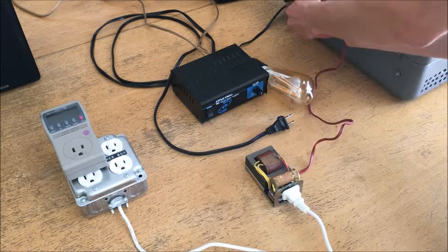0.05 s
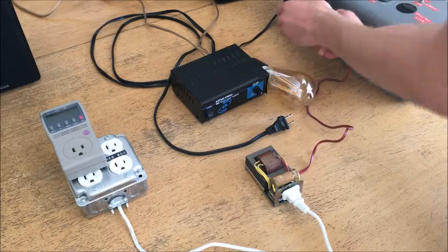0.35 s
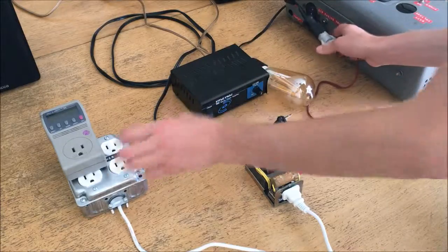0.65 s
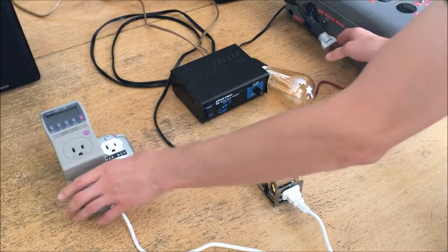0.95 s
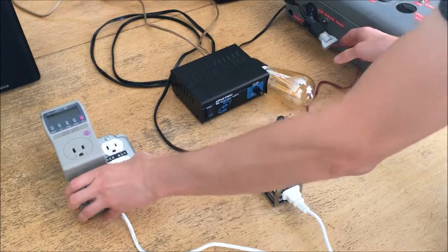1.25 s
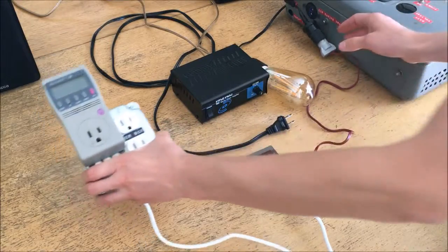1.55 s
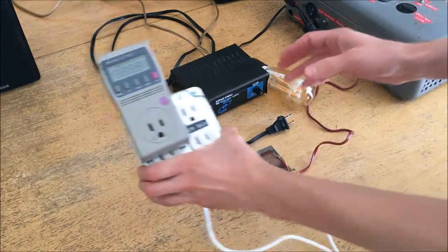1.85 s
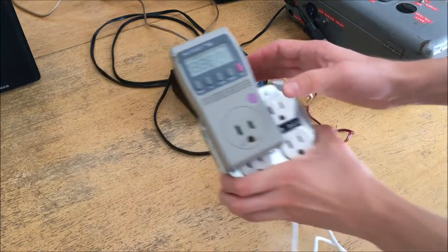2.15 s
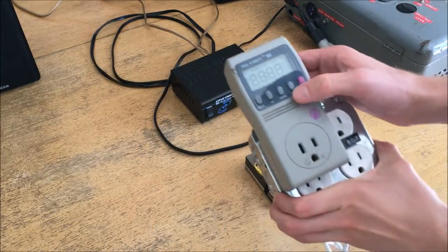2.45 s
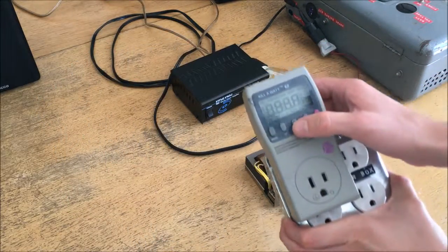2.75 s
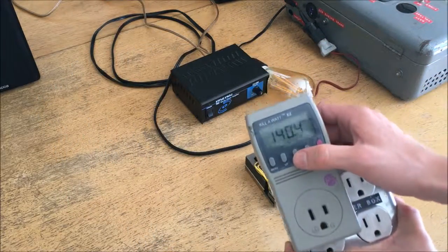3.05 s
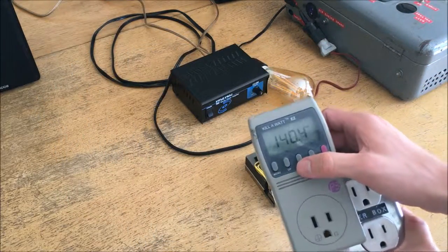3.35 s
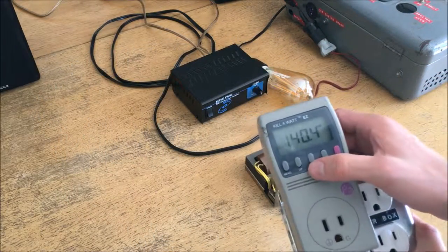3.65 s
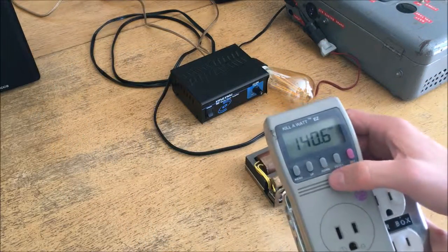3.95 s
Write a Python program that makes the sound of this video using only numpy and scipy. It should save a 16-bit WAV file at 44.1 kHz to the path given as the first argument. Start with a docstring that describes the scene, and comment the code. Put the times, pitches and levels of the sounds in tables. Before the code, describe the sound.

An old power inverter buzzes harshly and steadily, with a knock and a small click.

```python
"""Vibrator inverter on a wooden table

A small room, the microphone close to an old inverter. Its reed strikes the contacts 59 times a second
over the hum of the iron core; moving arms shade and scatter the bright clicks. A hand bumps the table,
an outlet box knocks as it is lifted, and a meter button clicks, over a low rumble."""
import sys
import numpy as np
from scipy import signal
from scipy.fft import rfft, irfft
from scipy.io import wavfile
from scipy.ndimage import uniform_filter1d

SR = 44100
rng = np.random.default_rng(int(sys.argv[2]) if len(sys.argv) > 2 else 0)


def transcribe(u):
    """Save the signal u as a 16-bit wav file named by the first command-line argument.

    u: samples, shape (n,) or (channels, n), limited to [-1, 1]; the rate is SR.
    q: integer samples, one column per channel.
    """
    v = np.clip(np.atleast_2d(u).T, -1, 1)
    q = np.round(v * 32767).astype(np.int16)
    wavfile.write(sys.argv[1], SR, q)


N = 176400
TIME_S = np.arange(N) / SR
CUTOFF_HZ = 15830


def amp(db):
    """Decibels to gain."""
    return 10 ** (np.asarray(db) / 20)


def unit(x):
    """Scales to rms 1."""
    return x / np.sqrt(np.mean(abs(x) ** 2) + 1e-20)


def curve(rows, column=1):
    """One column of a time table, at every sample."""
    rows = np.array(rows)
    return np.interp(TIME_S, rows[:, 0], rows[:, column])


def colour(x, points):
    """Minimum-phase filter through points of frequency_hz, gain_db."""
    point_hz, point_db = np.transpose(points)
    hz = abs(np.fft.fftfreq(8192, 1 / SR))
    log_gain = np.log(amp(np.interp(np.log(hz + 1), np.log(point_hz), point_db)))
    taps = np.fft.ifft(np.exp(np.conj(signal.hilbert(log_gain)))).real[:4096]
    return signal.oaconvolve(x, taps)[:N]


def drift(times, step_s, count):
    """Independent slow random curves, shape (times, count)."""
    weight = np.exp(-(times[:, None] / step_s - np.arange(-1, 40)) ** 2)
    weight /= np.linalg.norm(weight, axis=1, keepdims=True)
    return weight @ rng.standard_normal((41, count))


def add(mix, start, sound):
    """Mixes a sound in from a sample on."""
    part = mix[start:][:len(sound)]
    part += sound[:len(part)]


# Swells of the rumble: time_s, level_db
RUMBLE_LEVEL = [(0, -43), (.2, -46.5), (.3, -49), (.58, -58), (.75, -67), (1, -61.5), (1.42, -58),
                (1.62, -67), (1.8, -49.5), (2.4, -57), (2.8, -63), (3.35, -58.5), (4, -58)]
# Colours of the rumble and of the air: frequency_hz, relative_db
RUMBLE_COLOUR = [(20, -33), (36, -19), (46, -22), (56, -7), (65, -2), (74, -4), (85, -16), (105, -11),
                 (160, -36), (400, -73)]
AIR_COLOUR = [(20, -12), (100, -1), (170, -3), (300, -7), (550, -9), (800, -12), (2000, -13), (6000, -12),
              (16000, -14)]

def room_tone():
    """All around the microphone: a low swelling rumble and the still air of the room."""
    rumble = unit(colour(rng.standard_normal(N), RUMBLE_COLOUR))
    air = unit(colour(rng.standard_normal(N), AIR_COLOUR))
    return amp(curve(RUMBLE_LEVEL)) * rumble + amp(-52) * air


def reverb(x, t60_s=.45):
    """The small room's diffuse tail reaches the microphone just after the direct sound."""
    t = np.arange(SR // 2) / SR
    tail = rng.standard_normal(len(t)) * amp(-60 * t / t60_s) * (t > .004)
    return signal.oaconvolve(x, tail / np.linalg.norm(tail))[:N]


def struck(hits, modes, rise_s, scuff_db, scuff_s, wet_db):
    """Each hit rings the modes of an object, with a short scuff of noise in the same range."""
    t, out = np.arange(SR // 3) / SR, np.zeros(N)
    band = signal.butter(3, [modes[0][0], modes[-1][0]], "band", fs=SR, output="sos")
    for start_s, hit_db in hits:
        ring = sum(amp(db - 60 * t / t60) * np.sin(2 * np.pi * hz * t) for hz, db, t60 in modes)
        noise = unit(signal.sosfilt(band, rng.standard_normal(len(t))))
        scuff = amp(scuff_db) * np.exp(-t / scuff_s) * noise
        attack = 1 - np.exp(-t / rise_s)
        add(out, round(start_s * SR), amp(hit_db) * attack * (ring + scuff))
    return out + amp(wet_db) * reverb(out)


# Hits at the table: start_s, gain_db
BOX_KNOCKS = [(.775, -41), (1.5470, -33), (1.5512, -20.5)]
TABLE_BUMPS = [(.548, -39.5), (.572, -42.5), (.700, -46)]
BUTTON_CLICKS = [(3.9505, -23.5), (3.9526, -22.5), (3.9542, -27)]
# Modes of each object: pitch_hz, relative_db, t60_s
BOX_MODES = [(334, -30, 0.025), (389.6, -1, 0.08), (448, -11, 0.065), (719, -7.5, 0.058), (853, -1, 0.028),
             (1040, -14, .03), (1415, -10, 0.022), (1666, -17, 0.027), (2370, -19, .025), (3100, -17, .025)]
TABLE_MODES = [(105, -7, 0.09), (147, 7, 0.065), (210, 4.5, 0.081), (266, 5, 0.06)]
BUTTON_MODES = [(1540, -17, .012), (2300, -12, 0.011), (3730, -28, .01), (5440, -10, 0.012),
                (6035, -7, .01), (6040, 3, 0.0086), (6700, -7, .008)]

def handling():
    """Near the microphone the outlet box knocks, a hand bumps the wood and the meter button snaps."""
    box = struck(BOX_KNOCKS, BOX_MODES, rise_s=.003, scuff_db=-14, scuff_s=.011, wet_db=-7)
    table = struck(TABLE_BUMPS, TABLE_MODES, rise_s=.004, scuff_db=-8, scuff_s=.027, wet_db=-15)
    button = struck(BUTTON_CLICKS, BUTTON_MODES, rise_s=.00019, scuff_db=-11, scuff_s=.0018, wet_db=-7)
    return box + table + button


def lifted(from_s=1.35, to_s=2.5):
    """0 while the outlet box rests on the table, 1 once it is held above the inverter."""
    return np.clip((TIME_S - from_s) / (to_s - from_s), 0, 1)


# Core and frame partials, relative levels: reed_multiple (played rounded), box_resting_db, box_held_db
CORE_PARTIALS = [(2.01, -12.5, -12), (2.99, -9, -5.5), (4.023, -4, -2.5), (5.015, -11, -10.5),
                 (6, -14.5, -12), (7, -15, -12), (8, -26.5, -20.5), (9.023, 1, 2), (10.002, -2, -2.5),
                 (10.83, -27, -23.5), (11.97, -22, -17), (13, -23.5, -20), (14, -26.5, -22.5),
                 (15.014, -11, -12), (16.046, -17.5, -12), (17, -16.5, -21), (18, -35, -21.5),
                 (19, -11, -10.5), (20, -9.5, -8), (21.08, -21, -5), (22, -12, -13), (22.95, -10, -15),
                 (24, -22, -46), (25, -28.5, -20.5), (26, -25, -21), (27, -25, -24), (28, -31.5, -30),
                 (29, -51, -26), (30.12, -15.5, -17.5), (31.12, -18.5, -14)]
FRAME_PARTIALS = [(47, -27, -20), (50, -19, -14.5), (57, -19, -6.5), (59, -11, -14.5), (63.4, -12, -16),
                  (64, -18, -11.5), (66.8, -18, -25)]

def core_hum(swings, level_db=-44, waver_db=1.24):
    """The iron core hums and the metal frame rings; their harmonics shift in balance as the box lifts."""
    partials = CORE_PARTIALS + FRAME_PARTIALS
    coarse_s = np.linspace(0, N / SR, 100)
    wavers = amp(waver_db * drift(coarse_s, step_s=.308, count=len(partials)))
    phases = rng.random(len(partials))
    held, out = lifted(), np.zeros(N)
    for (multiple, rest_db, held_db), waver, phase in zip(partials, wavers.T, phases):
        level = amp(rest_db) * (1 - held) + amp(held_db) * held
        tone = np.sin(2 * np.pi * (round(multiple) * swings + phase))
        out += level * np.interp(TIME_S, coarse_s, waver) * tone
    return amp(level_db) * unit(out)


def reed_strikes(swings, first_s=.0103, rise_s=.00018, fall_s=.00091, drift_s=.7, jitter_db=.25):
    """The reed hits the contacts: one short metallic burst per swing, each much like the last."""
    strikes_s = np.interp(np.arange(int(swings[-1])), swings, TIME_S) + first_s
    t, hz = np.arange(512) / SR, np.fft.rfftfreq(1024, 1 / SR)
    envelope = (1 - np.exp(-t / rise_s)) * np.exp(-t / fall_s)
    # The burst changes slowly, and four drift steps further while the box moves.
    drift_clock = strikes_s + 4 * drift_s * np.interp(strikes_s, TIME_S, lifted())
    alike = unit(rfft(envelope * drift(drift_clock, drift_s, count=len(t)), 2 * len(t)))
    alike = unit(alike / (abs(alike) + .04) ** .72)  # evens out the spectrum
    alike /= np.sqrt(np.mean(abs(alike) ** 2, axis=1, keepdims=True))
    # A share is new at every strike, most of all in the top treble.
    fresh = unit(rfft(envelope * rng.standard_normal((len(strikes_s), len(t))), 2 * len(t)))
    spectra = alike + fresh * (.22 + .65 * (hz / CUTOFF_HZ) ** 6)
    spectra *= amp(jitter_db * rng.standard_normal((len(strikes_s), 1)))
    lead, out = len(t) // 4, np.zeros(N)
    for start, spectrum in zip(strikes_s * SR - lead, spectra):
        delay = np.exp(-2j * np.pi * hz / SR * (lead + start % 1))  # lands between samples
        add(out, int(start), irfft(spectrum * delay))
    return out


# Limits of the four click bands: edge_hz
BAND_EDGES_HZ = [1000, 5300, 7800, 10300, 17000]
# Band levels before the trim: time_s, low_db, mid_db, high_db, top_db
ARM_SHADING = [(0.03, -41.5, -49, -37, -42), (0.2, -41.5, -48.5, -36.5, -44),
               (0.42, -40.5, -46.5, -36, -43), (0.58, -41.5, -49, -36.5, -44.5),
               (0.8, -44, -47.5, -37, -42.5), (1.05, -42.5, -49, -38.5, -42),
               (1.32, -42.5, -49, -39.5, -42.5), (1.5, -41, -49, -44, -46.5),
               (1.68, -41, -49.5, -41.5, -45.5), (1.87, -44.5, -47, -39.5, -43),
               (2.1, -43.5, -50.5, -40.6, -50), (2.22, -43.5, -49, -45.5, -44.5),
               (2.3, -46, -49.5, -48, -54), (2.42, -46.5, -47.5, -36.5, -49), (2.6, -49, -49.5, -37.5, -44),
               (2.75, -48.5, -50, -42.5, -45), (3.0, -46.5, -49, -44, -45),
               (3.35, -44.5, -51.5, -44, -43.5), (3.6, -45, -49.5, -45.5, -46),
               (3.9, -45, -50.5, -42.5, -46.5)]
# Direct path to the microphone, one value a band: trim_db
BAND_TRIM_DB = [-1.9, -0.3, -0.28, -0.58]

def arm_shading(clicks):
    """Arms moving between inverter and microphone shade the clicks, band by band."""
    spectrum, hz = rfft(clicks), np.fft.rfftfreq(N, 1 / SR)
    out = np.zeros(N)
    for k, trim_db in enumerate(BAND_TRIM_DB):
        lower, upper = [np.tanh((hz - edge) / 300) for edge in BAND_EDGES_HZ[k:k + 2]]
        band = irfft(spectrum * (lower - upper), N)
        running_rms = np.sqrt(uniform_filter1d(band ** 2, size=8977) + 1e-20)
        out += amp(trim_db + curve(ARM_SHADING, column=k + 1)) * band / running_rms
    return out


# Colour of the clicks, relative levels: frequency_hz, box_resting_db, box_held_db
CONTACT_COLOUR = [(1390, -49, -37.5), (1990, -25.5, -22), (2240, -26, -29), (2340, -12.5, -12.5),
                  (2536, -27, -24.5), (2770, -14, -9.5), (2976, -9.5, -12), (3106, -27.5, -21.5),
                  (3345, -9, -11), (3770, -4.5, -9), (4060, -13.5, -13), (4570, -17.5, -16),
                  (5055, -16.5, -16.5), (5056, -30.5, -30.5), (6010, -21.5, -20.5), (6770, -15.5, -16.5),
                  (7820, -28, -24.5), (8250, -11, -10.5), (8640, -12.5, -3.5), (9910, 1, 8),
                  (9760, -9.5, 0), (10140, -11, -2.5), (11260, 3.5, 0.5), (11780, -1.5, 1),
                  (13100, -9, -11.5), (13400, -13, -16), (15500, -14.5, -15)]
# Colour of their reverberation: frequency_hz, relative_db
REVERB_COLOUR = [(2000, -2), (3500, 1.5), (6500, 10.5), (9500, -7.5), (12000, -5.5), (15500, 0)]
# Reflections off the near walls: delay_s, gain_db
WALL_ECHOES = [(.0053, -9.5), (.0097, -16.5), (0.0136, -14.5)]

def contact_buzz(swings, reverb_db=-41.5):
    """The contact clicks reach the microphone directly and by way of the walls."""
    strikes, colours, held = reed_strikes(swings), np.array(CONTACT_COLOUR), lifted()
    box_resting = colour(strikes, colours[:, [0, 1]])
    box_held = colour(strikes, colours[:, [0, 2]])
    clicks = (1 - held) * box_resting + held * box_held
    direct = arm_shading(clicks)
    out = direct + amp(reverb_db) * unit(colour(reverb(clicks), REVERB_COLOUR))
    for delay_s, gain_db in WALL_ECHOES:
        add(out, round(delay_s * SR), amp(gain_db) * direct)
    return out


# Speed of the reed: time_s, rate_hz
REED_RATE = [(0, 58.915), (1, 58.942), (2.3, 58.952), (4, 58.956)]

def inverter():
    """Close up, one swinging reed sets the pace of both hum and buzz."""
    swings = np.cumsum(curve(REED_RATE)) / SR
    return core_hum(swings) + contact_buzz(swings)


def scene():
    """Handling, inverter and room tone at one microphone."""
    return (handling() + inverter() + room_tone())[None]


def record(dry):
    """The microphone signal passes a steep low-pass filter."""
    lowpass = signal.firwin(1023, CUTOFF_HZ, window=("kaiser", 9), fs=SR)
    return signal.oaconvolve(dry, lowpass[None], "same")


dry = scene()
out = record(dry)
transcribe(out)
```